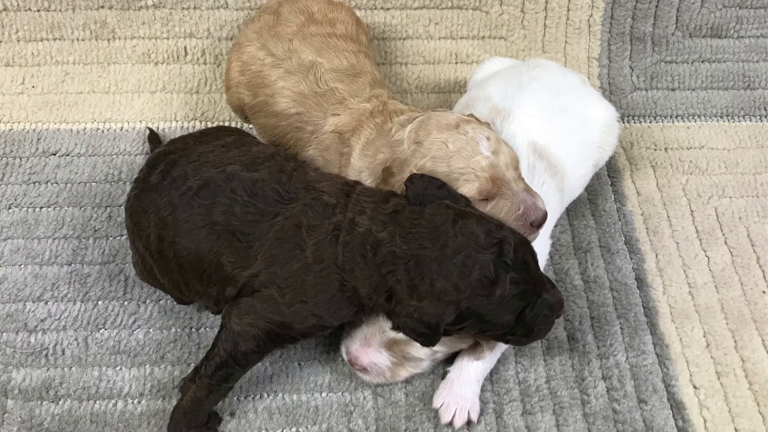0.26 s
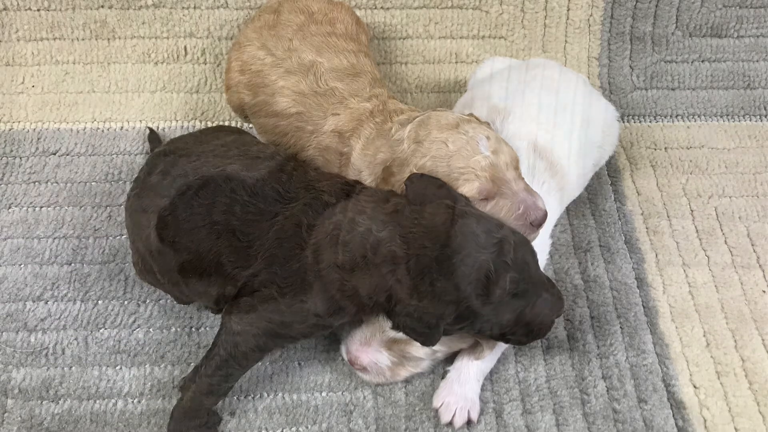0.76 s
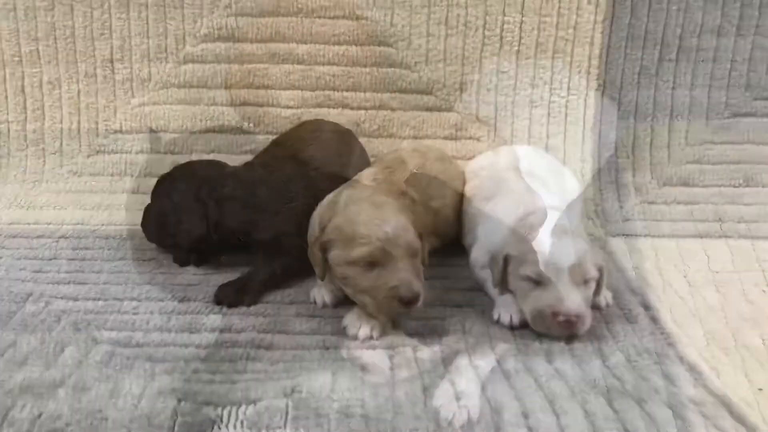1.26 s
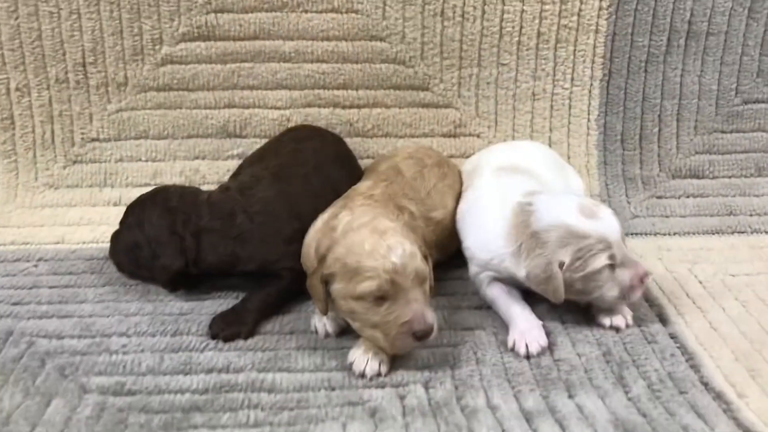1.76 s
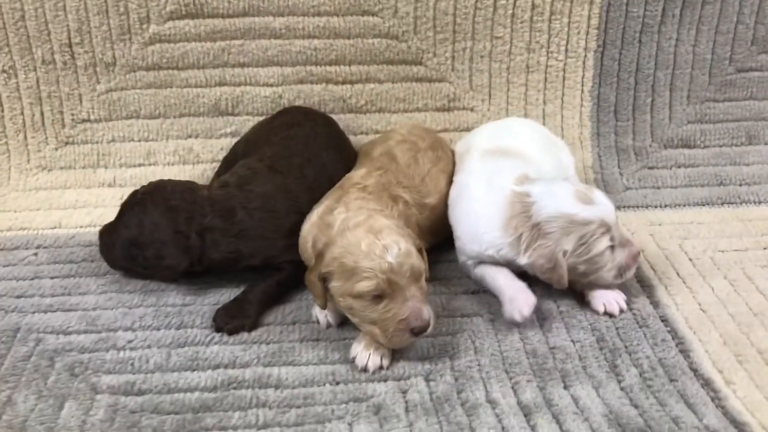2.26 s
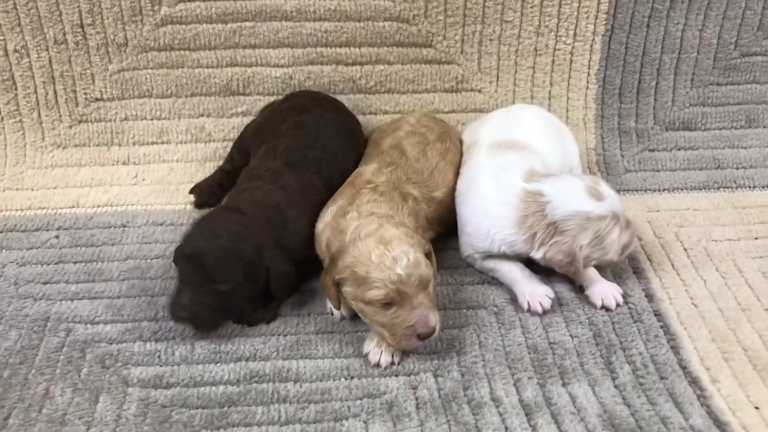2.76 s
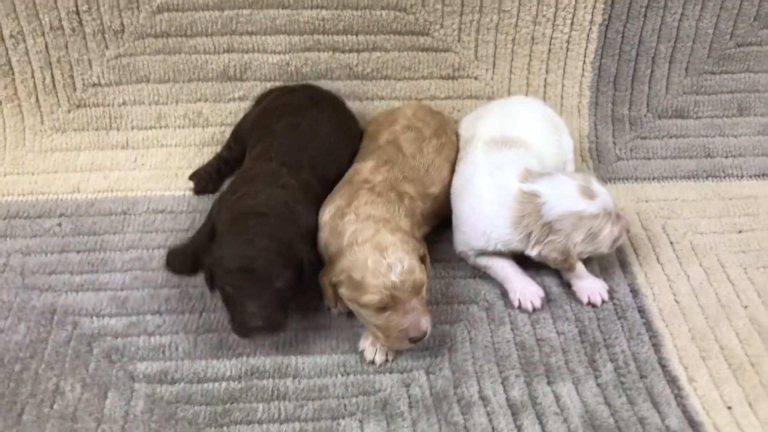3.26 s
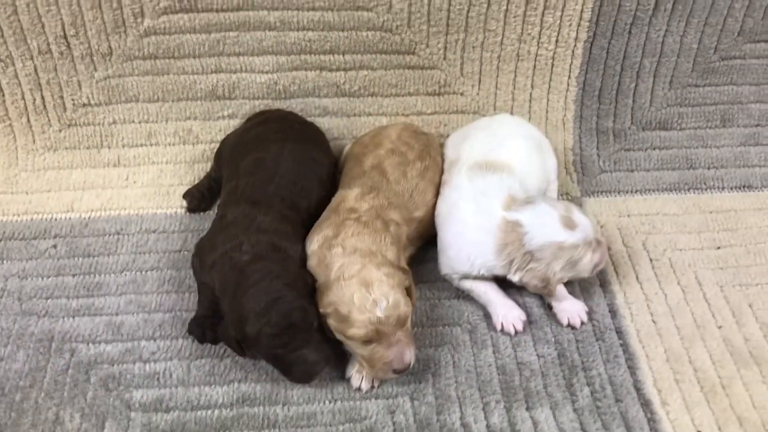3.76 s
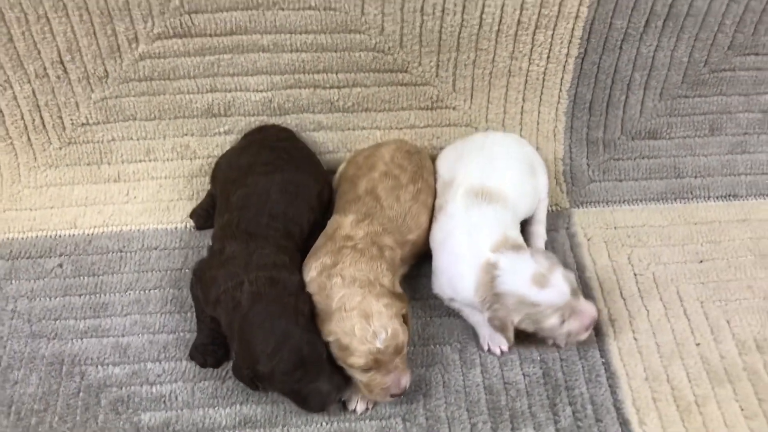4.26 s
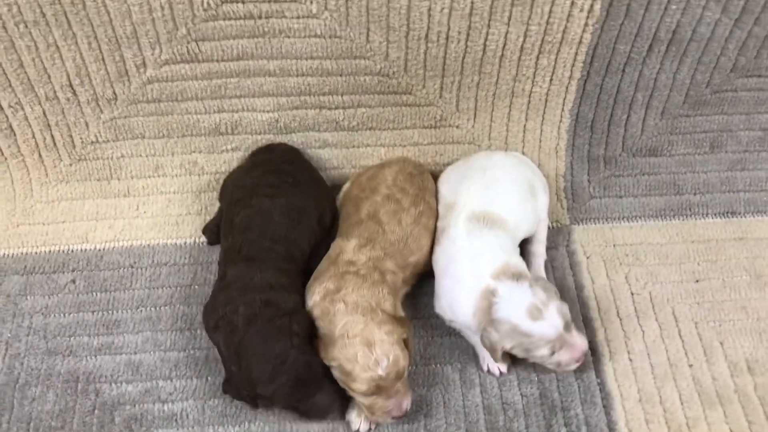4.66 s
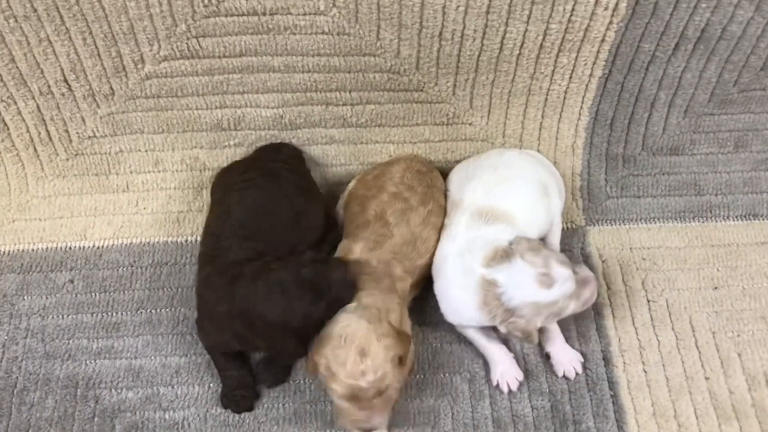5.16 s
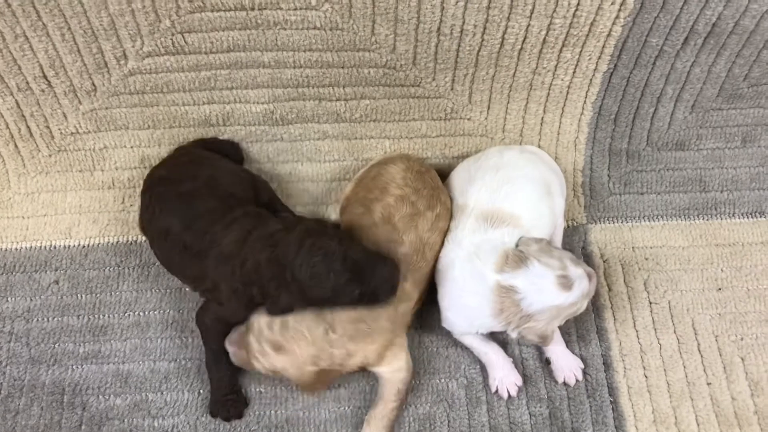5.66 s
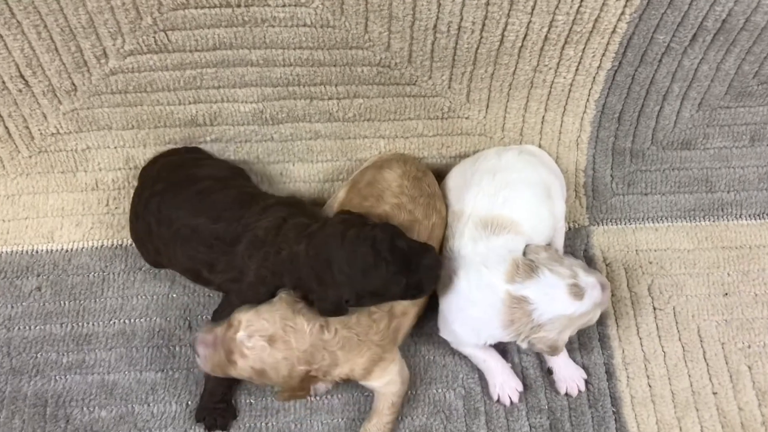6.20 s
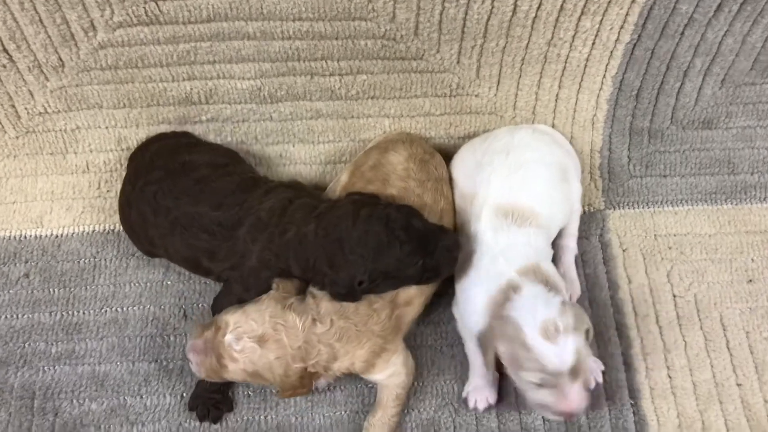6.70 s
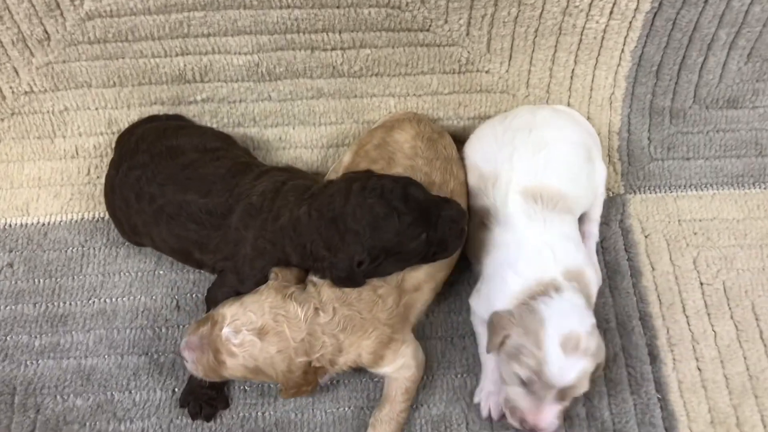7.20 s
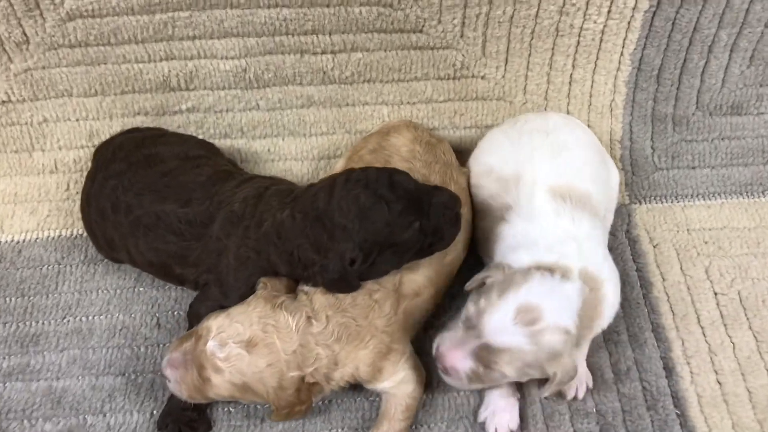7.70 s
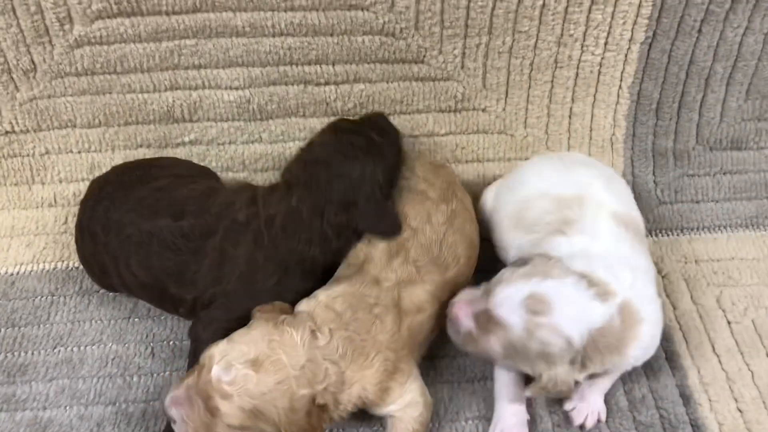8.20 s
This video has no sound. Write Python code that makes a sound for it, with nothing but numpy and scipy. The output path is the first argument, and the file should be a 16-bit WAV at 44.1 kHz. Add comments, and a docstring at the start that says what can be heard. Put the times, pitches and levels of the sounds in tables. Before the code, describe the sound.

Near silence fades into low room rumble and faint hiss. A thin puppy squeak with a hoarse end comes first, then one loud, piercing squeal that shoots up and drops away. Brief newborn squeaks follow, some clear, some raspy and cracked, with soft moans, faint rubbing on a rug, small wet mouth clicks and one dull bump. The microphone is close, in a small, softly echoing room.

```python
"""Newborn puppies squeak on a rug in a quiet room, near a small microphone.
Room rumble, hum and hiss (filtered noise, sines) fade in; a thin squeak with a raspy end and a soft moan follow.
A loud squeal then climbs and falls away; after it come squeaks with moans, rubs, mouth clicks and one bump.
A squeak may start with a rasp, scoop through a dip where it can split into half tones, top out and fall.
Voices are phase-driven harmonics plus noise; spurts of air follow some of the later loud squeaks."""
import sys
import numpy as np
from scipy import signal
from scipy.fft import rfft, irfft, next_fast_len
from scipy.io import wavfile

SR = 44100
rng = np.random.default_rng(int(sys.argv[2]) if len(sys.argv) > 2 else 0)


def dump(signal):
    """Clip the signal to [-1, 1] and save it as 16-bit WAV at the path in sys.argv[1]."""
    limited = np.clip(np.atleast_2d(signal).T, -1, 1)
    pcm = np.round(limited * 32767).astype(np.int16)
    wavfile.write(sys.argv[1], SR, pcm)


N = 372204
TIME_S = np.arange(N) / SR

# deep room noise, relative density: (freq_hz, density_db)
RUMBLE_COLOUR = [(15, -65.5), (25, -33.5), (35, -24.5), (46, -12.5), (70, 2.5), (102, -4), (130, -2),
                 (207, -6.5), (248, -9), (340, -13), (479, -22), (533, -21.5), (687, -24), (752, -28),
                 (900, -31.5), (1170, -56.5), (1980, -120)]
# room hiss, relative density: (freq_hz, density_db)
HISS_COLOUR = [(410, -31), (700, -2), (839, -7.5), (1070, -1), (1290, -6.5), (1760, -3.5), (2590, -7.5),
               (4400, -8), (6330, -10.5), (14700, -14), (15500, -20)]
# faint hum of household machines, before the fade: (freq_hz, level_db)
HUM_LINES = [(65, -75.5), (136, -80.5)]
# background fade: (time_s, gain_db)
BACKGROUND_FADE = [(0, -90), (.56, -51.5), (.62, -19), (.8, -13.5), (.93, -9), (1.2, -3), (1.5, 0.5),
                   (2.3, 0.5), (3.3, 0), (5, 0.5), (8.44, 1.5)]
# room decay: (freq_hz, t60_s)
ROOM_DECAY = [(200, 0.56), (900, 0.325), (2000, 0.3906), (5000, 0.26), (12000, 0.09)]
# bumps of a body on the padded floor, level before the bell: (middle_s, pitch_hz, level_db, bell_sigma_s)
FLOOR_BUMPS = [(2.4629, 131.2, -40, 0.00336)]
# rubbing on the rug; the first row is the first squeak's hoarse end; level before the window:
# (middle_s, length_s, level_db)
RUBS_AND_HOARSE_END = [(1.004, 0.067, -63.5), (3.799, 0.2325, -72.5), (4.151, 0.279, -67.5),
                       (6.483, 0.1664, -68), (6.93, 0.3, -66.5), (7.202, 0.401, -74.5)]
# wet mouth clicks, level before halving and decay: (start_s, level_db)
MOUTH_CLICKS = [(1.333, -50.5), (6.293, -47.5), (8.229, -49)]
# colour of rubs, hoarse end and clicks: (freq_hz, gain_db)
DULL_NOISE_COLOUR = [(150, 2.5), (400, 6.5), (1000, -0.5), (1500, -5.5), (2100, -5.5), (3200, -22.5),
                     (5000, -24.5), (10000, -33), (15000, -41.5)]
# soft low voice tones: moans, a grunt's low end (2.184) and a squeak's soft lead-in (5.546);
# level is the fundamental's, at mid-tone:
# (start_s, length_s, first_hz, middle_hz, last_hz, level_db, overtones_db)
LOW_TONES = [(1.055, 0.0504, 439.4, 474.5, 480, -71.5, -12.5),
             (1.524, 0.082, 400.5, 362.1, 394, -60.5, -16), (2.184, 0.0232, 330, 379, 380, -55, -19.5),
             (4.098, 0.076, 562.2, 458.5, 532, -65, -6), (4.175, 0.0375, 568.6, 624.8, 576, -63, -8.5),
             (4.209, 0.0495, 560, 479.7, 470, -63, -6), (5.546, 0.043, 709, 738.6, 696, -60, -17),
             (6.027, 0.0543, 431, 370.6, 360.5, -59.5, -11), (6.291, 0.0298, 349, 346.5, 318, -51, -15),
             (6.468, 0.0446, 676, 656.2, 614, -61.5, -17), (6.866, 0.071, 486.6, 462.6, 498, -63, -13),
             (7.256, .07, 484, 429.6, 498.2, -61, -8)]
# spurts of air as the folds spring open after a loud squeak, level before the window:
# (middle_s, length_s, level_db)
AIR_SPURTS = [(6.795, 0.086, -67.5), (7.717, 0.04, -71), (8.093, 0.032, -70.5), (8.383, 0.0615, -71)]
# colour of the spurts: (freq_hz, gain_db)
SPURT_COLOUR = [(1000, -25), (2800, 2.5), (4700, -1.5), (7000, -6), (9000, -12), (11000, -7), (14500, -16)]
# throat colour of the upper overtones: (freq_hz, gain_db)
THROAT_COLOUR = [(700, -7), (1100, -1.5), (1400, -5.5), (1650, 0), (2050, 7.5), (2400, -2), (2750, -5.5),
                 (3300, -7), (4000, -13), (4900, -10.5), (5500, -6), (6300, -38), (7500, -32.5)]
# colour of the thin edge from the snap of the folds: (freq_hz, gain_db)
EDGE_COLOUR = [(3000, -33), (5300, -22.5), (6300, -14.5), (7100, 4.5), (7700, -5.5), (8300, 1), (9000, 1),
               (9800, -7.5), (10800, 5.5), (11700, -1), (13200, -5), (14100, -7), (15500, -14.5)]
# colour of rasp and half tones: (freq_hz, gain_db)
RASP_COLOUR = [(150, -10.5), (400, -5.5), (650, -5), (880, 6), (1150, -5), (1500, -10), (2050, -24),
               (2700, -32.5), (5000, -46), (11000, -45.5), (15000, -46)]
# octave strength, strong where it meets a throat resonance: (pitch_hz, db_re_fundamental)
OCTAVE_BY_PITCH = [(530, 7.5), (580, 4.5), (680, -8), (780, -13.5), (870, -13.5), (950, -16.5),
                   (1020, -4.5), (1120, -10), (1300, -16.5), (1450, -18), (1820, -22)]
# upper overtone strength: (pitch_hz, db_re_level)
OVERTONES_BY_PITCH = [(520, -19), (600, -17.5), (680, -14.5), (780, -21), (880, -28.5), (950, -29.5),
                      (1120, -33.5), (1300, -29.5), (1450, -20), (1650, -20.5), (1820, -20.5)]
# squeaks; dip_s and top_s count from start_s, short ones stop before the top;
# levelling flattens the end of the fall (0 = keeps steepening); octave_db and overtones_db offset
# the by-pitch tables; half_tones is a 0-1 strength:
# (start_s, length_s, dip_s, dip_hz, top_s, top_hz, end_hz, levelling, level_db, swell_db, pinch_db,
#  octave_db, overtones_db, edge_db, rasp_s, half_tones)
SQUEAK_CALLS = [ (.832, 0.1947, -0.0014, 1219, 0.0597, 1543, 936.4, 6, -61, 0, -2.5, 0, -15, -30, 0.0028, 0),
                (1.741, 0.1488, -0.0201, 1068, 0.1007, 1822, 969, 0.3, -50, 6.5, 8.5, -3, -2.5, -24.5, 0.00564, 0.53),
                (2.167, 0.0348, 0.0117, 661.4, 0.0413, 727, 725, -1, -60.5, -7, -1.5, -2.5, -8, -26.5, 0.033, 0.081),
                (2.68, 0.1268, 0.0271, 822.2, 0.127, 957.3, 920, 6, -46.5, 3, 0, 3.5, -11, -37.5, 0.0118, 0),
                (3.046, 0.071, .05, 886.2, 0.107, 1049, 1050, -2.5, -51, 4, -1.5, 2, -14, -32, 0.0437, 0.596),
                (3.597, 0.084, .041, 560, 0.1126, 730.2, 725, 0, -50, 1, -0.5, 3.5, 1, -36, 0.016, 0),
                (3.686, 0.0575, 0.02, 813, 0.0538, 899.4, 883, -0.5, -54.5, -5, 4, 3.5, -5, -31, 0.0017, 0),
                (3.89, 0.1589, 0.0403, 628.3, 0.1077, 935.2, 794.4, -0.5, -50, 4, -1, 1.5, -5.5, -31.5, 0.0381, 0.46),
                (4.262, 0.192, 0.0368, 658.8, 0.1011, 906, 571, 4.5, -51.5, 1.5, -4.5, -2, -6, -30, 0.062, 0.415),
                (4.64, 0.1838, 0.0118, 924.4, 0.095, 1399, 730.5, 2, -48, 2, 1.5, -4, -6, -29, 0.014, 0.044),
                (4.82, 0.1306, 0.0139, 760.2, 0.04, 867.9, 685.3, 0, -50, -4, 1, 3.5, 6, -26.5, 0.00057, 0),
                (5.164, 0.1781, 0.0509, 570.1, 0.0954, 702.8, 657.2, 8, -52.5, 9, -1, -4.5, 2.5, -29.5, 0.0432, 0.98),
                (5.583, 0.0957, 0.0575, 517.8, .12, 677.7, 675, -3, -51, 2, -2.5, -3.5, 0.5, -36, 0.032, 0.12),
                (5.951, .083, 0.0403, 831.2, .083, 952.2, 950, 0, -51, 2, 1, -1.5, -8, -34, 0.014, 0),
                (6.243, 0.1638, -0.00087, 1164, 0.1031, 1802, 1047, 0.36, -49, 2.5, 12, 5, 0, -24, 0.00162, 0.012),
                (6.601, 0.191, 0.0302, 946, 0.0975, 1352, 727.7, 3.5, -44.5, 5.5, 3.5, 5.5, 6.5, -29, 0.0102, 0.143),
                (7.005, 0.0485, 0.04216, 602, 0.101, 878, 869, 0, -50.5, -2, -2, -11.5, 8.5, -33, 0.0192, 0.42),
                (7.533, 0.1741, 0.0239, 908.3, .091, 1291, 830.7, 4, -41.5, 1.5, 11, 2.5, -7.5, -32.5, 0.00447, 0.044),
                (7.929, .155, 0.038, 672.1, 0.117, 954, 827.4, 1.75, -45, 0, -5, -1.5, 2, -32.5, 0.01315, 0.062),
                (8.288, 0.076, 0.0442, 534.2, 0.1106, 788.6, 792, 0, -45, 2.5, 6, -4, 2, -31, 0.0126, 0.95)]
# the one loud squeal: (time_s, pitch_hz, level_db, octave_db_re_fundamental, overtones_db_re_level)
SQUEAL_PATH = [(1.274, 1040, -50.5, -3.5, -27), (1.289, 1040, -47.5, 5, -30.5),
               (1.303, 1144, -44, -12, -30.5), (1.328, 1182, -41, 4.5, -17.5),
               (1.35, 1512, -33.5, -9, -10.5), (1.382, 1626, -31.5, -7, -17.5),
               (1.403, 1933, -28, -30.5, -29), (1.43, 2098, -32, -35.5, -54.5),
               (1.469, 1776, -37, -34, -44.5), (1.491, 1518, -45.5, -28.5, -43),
               (1.504, 1123, -70.5, 11, -18.5)]

RUMBLE_DB, HISS_DB = -63.5, -77  # before the fade
LOW_TONE_ENDS_DB, LOW_TONE_RAMP_S = -5.5, 0.0055  # a low tone is loudest in its middle
RAMP_S = .004
SQUEAL_EDGE_DB = -32
RASP_DEPTH, CLEAR_ROUGH = 0.6976, 0.01654  # roughness added at the start; roughness once settled
RASP_DULL_DB, RASP_FLUTTER_DB = -13, 4  # a rasp smothers overtones and sputters; per unit roughness
# half tones last until the pitch climbs out of the dip
SPLIT_AFTER_DIP_S, SPLIT_FADE_S, CLEAR_HALF = 0.0213, 0.002, 0.0132
# low notes are hoarse; half tones come and go
SLACK_HZ, SLACK_ROUGH, SPLIT_WAVER = 591, 0.0727, 0.333
OPEN_S, OPEN_DB = 0.0134, -4  # soft start
# taut folds shut with a push, slack ones with a soft rattle
CLOSE_S, CLOSE_DB, CLOSE_PER_OCTAVE_DB, CLOSE_ROUGH = 0.00575, -3.5, 10, 0.26
# barely touching at either end, the folds make few overtones
DULL_S, DULL_OCTAVE_DB, DULL_UPPER_DB = .012, -8.5, -5.5
PINCH_S, PINCH_LEAD_S = 0.03086, 0.0064  # width of the throat's tightening; its lead on the top
PINCH_OCTAVE = 0.514  # share of the pinch that the octave escapes
CLIMB_BRIGHT = 0.89  # pinched throat is brighter on the climb than on the fall: share of the pinch
FALL_HALF, FALL_ROUGH = 0.065, .04  # falling from the top, folds slacken and grow uneven
CUTOFF_HZ = 15500


def amp(db):
    """Decibels to gain."""
    return 10 ** (np.asarray(db) / 20)


def unit(x):
    """Scales to rms 1."""
    return x / np.sqrt(np.mean(x ** 2) + 1e-20)


def read(points, hz):
    """Reads a table on a log-frequency axis."""
    point_hz, value = np.transpose(points)
    return np.interp(np.log(hz + 1), np.log(point_hz + 1), value)


def colour(x, points):
    """Filters by a spectrum table; rms 1."""
    size = next_fast_len(len(x))
    gain = amp(read(points, np.fft.rfftfreq(size, 1 / SR)))
    return unit(irfft(rfft(x, size) * gain, size)[:len(x)])


def wander(count, rate_hz):
    """Smooth random motion of about rms 1, no faster than about rate_hz."""
    size = next_fast_len(count + SR // 4)
    hz = np.fft.rfftfreq(size, 1 / SR)
    spectrum = rfft(rng.standard_normal(size)) * np.exp(-(hz / rate_hz) ** 2)
    return unit(irfft(spectrum, size))[:count]


def add(mix, start_s, sound):
    """Mixes a sound in at a time."""
    part = mix[max(round(start_s * SR), 0):][:len(sound)]
    part += sound[:len(part)]


def gate(t, ramp_s):
    """Smooth on and off at the ends of a call."""
    from_end_s = np.minimum(t - t[0], t[-1] - t)
    return np.sin(np.pi / 2 * np.clip(from_end_s / ramp_s, 0, 1)) ** 2


def curve(t, s, values):
    """A rounded (cubic) line through control points."""
    i = np.clip(np.searchsorted(s, t) - 1, 0, len(s) - 2)
    step, rise = np.diff(s)[i], np.diff(values)[i]
    slope = np.gradient(values, s)
    u = np.clip((t - s[i]) / step, 0, 1)
    bend_in = slope[i] * step - rise
    bend_out = slope[i + 1] * step - rise
    return values[i] + u * rise + u * (1 - u) * ((1 - u) * bend_in - u * bend_out)


def partials(turns, hz, multiples, shape, slope_db, uneven_db=0):
    """Pitch multiples sweep through a fixed colour, each swelling on its own; about rms 1 together."""
    k = multiples[:, None]
    swell = np.array([wander(len(hz), rate_hz=40) for _ in multiples])
    gain = amp(read(shape, k * hz) + slope_db * np.log2(k) + uneven_db * swell)
    gain = gain * (k * hz < SR / 2)
    return (gain * np.cos(2 * np.pi * k * turns)).sum(0) / np.sqrt((gain ** 2).sum(0) / 2)


def background(swell_db=0.74, heave_db=2.67, split_hz=170):
    """Deep rumble, nearly steady below the split and heaving above it; faint hum; even hiss."""
    rumble = colour(rng.standard_normal(N), RUMBLE_COLOUR)
    deep = signal.sosfiltfilt(signal.butter(2, split_hz, fs=SR, output="sos"), rumble)
    steady = deep * amp(swell_db * wander(N, rate_hz=11))
    heaving = (rumble - deep) * amp(heave_db * wander(N, rate_hz=22))
    hum = sum(np.sqrt(2) * amp(db) * np.sin(2 * np.pi * (hz * TIME_S + rng.random()))
              for hz, db in HUM_LINES)
    hiss = amp(HISS_DB) * colour(rng.standard_normal(N), HISS_COLOUR)
    fade = amp(np.interp(TIME_S, *np.transpose(BACKGROUND_FADE)))
    return (amp(RUMBLE_DB) * (steady + heaving) + hum + hiss) * fade


def room(x, wet_db=-19, early_db=-20, early_decay_s=0.018, delay_s=0.0034):
    """Near walls answer with sparse early echoes, over a soft tail whose treble dies soonest."""
    t = np.arange(SR // 2) / SR
    hz, frame_s, z = signal.stft(rng.standard_normal(len(t)), SR, nperseg=256)
    decay = amp(-60 * frame_s / read(ROOM_DECAY, hz)[:, None])
    tail = signal.istft(z * decay, SR, nperseg=256)[1][:len(t)]
    sparse = rng.random(len(t)) < 600 / SR  # about 600 echoes per second
    early = rng.standard_normal(len(t)) * sparse * np.exp(-t / early_decay_s)
    late = t > delay_s
    echo = amp(wet_db) * unit(tail * late) + amp(early_db) * unit(early * late)
    return x + signal.fftconvolve(x, echo / np.sqrt(len(t)))[:N]


def bumps():
    """Dull thuds: a low sine under a bell-shaped envelope."""
    out = np.zeros(N)
    for middle_s, hz, db, sigma_s in FLOOR_BUMPS:
        t = TIME_S - middle_s
        out += amp(db) * np.exp(-(t / sigma_s) ** 2 / 2) * np.sin(2 * np.pi * hz * t)
    return out


def rubs_and_hoarse_end(clump_db=2.0):
    """Rubbing on the rug, and the first squeak's hoarse end: coloured noise with clumpy level."""
    out = np.zeros(N)
    for middle_s, length_s, db in RUBS_AND_HOARSE_END:
        count = int(length_s * SR)
        clumpy = rng.standard_normal(count) * amp(clump_db * wander(count, rate_hz=140))
        noise = np.hanning(count) ** .5 * colour(clumpy, DULL_NOISE_COLOUR)
        add(out, middle_s - length_s / 2, amp(db) * noise)
    return out


def mouth_clicks(decay_s=0.005):
    """Wet clicks: coloured noise dying exponentially."""
    out, t = np.zeros(N), np.arange(SR // 10) / SR
    for start_s, db in MOUTH_CLICKS:
        noise = colour(rng.standard_normal(len(t)), DULL_NOISE_COLOUR)
        add(out, start_s, amp(db) / 2 * np.exp(-t / decay_s) * noise)
    return out


def low_tones():
    """Soft low voice, weak overtones; pitch and level (dB) each follow a parabola."""
    out = np.zeros(N)
    for start_s, length_s, first_hz, middle_hz, last_hz, level_db, over_db in LOW_TONES:
        t = np.arange(0, length_s, 1 / SR)
        u = 2 * t / length_s - 1
        hz = np.polyval(np.polyfit([-1, 0, 1], [first_hz, middle_hz, last_hz], 2), u)
        turns = np.cumsum(hz * (1 + .012 * wander(len(hz), rate_hz=150))) / SR
        fundamental = np.sqrt(2) * np.cos(2 * np.pi * turns)
        overtones = amp(over_db) * partials(turns, hz, np.arange(2, 6), THROAT_COLOUR, slope_db=-17)
        envelope = amp(level_db + LOW_TONE_ENDS_DB * u ** 2) * gate(t, LOW_TONE_RAMP_S)
        add(out, start_s, envelope * (fundamental + overtones))
    return out


def spurts():
    """Air let out as the folds spring open: windowed coloured noise."""
    out = np.zeros(N)
    for middle_s, length_s, db in AIR_SPURTS:
        count = int(length_s * SR)
        air = colour(rng.standard_normal(count), SPURT_COLOUR)
        add(out, middle_s - length_s / 2, amp(db) * np.hanning(count) * air)
    return out


def folds(hz, octave_db, upper_db, edge_db, half, rough, jitter=0.0045, rough_jitter=.08, half_db=-3,
          rasp_db=-2, air_db=-34, shimmer_db=1.0, flutter_db=1.5, snap_jitter_turns=.009, airy_hz=720,
          octave_waver_db=2):
    """Vocal folds whistle cleanly, alternate strong and weak cycles, or rattle irregularly."""
    count, half, rough = len(hz), np.clip(half, 0, 1), np.clip(rough, 0, 1)
    # slack folds lose their steady period
    turns = np.cumsum(hz * (1 + (jitter + rough_jitter * rough) * wander(count, rate_hz=200))) / SR
    octave_db = octave_db + octave_waver_db * wander(count, rate_hz=86)
    tone = np.cos(2 * np.pi * turns) + amp(octave_db) * np.sin(2 * np.pi * 2 * turns)
    tone *= np.sqrt(2 / (1 + amp(2 * octave_db)))
    tone *= amp(shimmer_db * wander(count, rate_hz=110.0))
    overtones = np.arange(3, 27)
    upper = amp(upper_db) * partials(turns, hz, overtones, THROAT_COLOUR, slope_db=-14.0, uneven_db=2.0)
    # the instant of closing varies from cycle to cycle and smears the highest lines
    snap_turns = turns + snap_jitter_turns * wander(count, rate_hz=780)
    snap = partials(snap_turns, hz, overtones, EDGE_COLOUR, slope_db=-8.5, uneven_db=5.5)
    # the lower the pitch, the more air leaks through and turns the edge into hiss
    leak = (airy_hz / hz) ** 2
    hiss = colour(rng.standard_normal(count) * (1 + np.cos(2 * np.pi * turns)), EDGE_COLOUR)
    edge = (snap + leak * hiss) / np.sqrt(1 + leak ** 2)
    edge *= amp(edge_db + flutter_db * wander(count, rate_hz=120))
    # every second cycle weaker: lines halfway between the harmonics
    halves = amp(half_db) * partials(turns, hz, np.arange(6) + .5, RASP_COLOUR, slope_db=0)
    # rattling folds let out a puff of air on every strong cycle
    puffs = colour(rng.standard_normal(count) * (1 + np.cos(np.pi * turns)), RASP_COLOUR)
    puff_gain = rough * amp(rasp_db) + leak * amp(air_db)
    clean = np.sqrt((1 - rough ** 2) * (1 - half ** 2 / 2))
    return clean * tone + upper + edge + half * halves + puff_gain * puffs


def squeal(rough=.01):
    """Start and sound of the loud cry: clean folds, bright on the climb, nearly pure at the top."""
    s, pitch_hz, *levels = np.transpose(SQUEAL_PATH)
    t = np.arange(s[0] - RAMP_S / 2, s[-1], 1 / SR)
    level_db, octave_db, upper_db = (np.interp(t, s, column) for column in levels)
    voice = folds(curve(t, s, pitch_hz), octave_db, upper_db, SQUEAL_EDGE_DB, 0, rough)
    return t[0], amp(level_db) * gate(t, RAMP_S) * voice


def glide(t, dip_s, dip_hz, top_s, top_hz, end_hz, levelling):
    """Pitch swings through the dip up to the top, then falls to the end."""
    swing = np.sin(np.pi / 2 * (t - dip_s) / (top_s - dip_s)) ** 2
    climb_hz = dip_hz + (top_hz - dip_hz) * swing
    u = np.maximum(t - top_s, 0) / max(t[-1] - top_s, 1e-6)
    bend = levelling + 1e-6
    fall_hz = top_hz + (end_hz - top_hz) * np.expm1(-bend * u ** 2) / np.expm1(-bend)
    return np.where(t < top_s, climb_hz, fall_hz)


def squeak(length_s, dip_s, dip_hz, top_s, top_hz, end_hz, levelling, level_db, swell_db, pinch_db,
           octave_db, over_db, edge_db, rasp_s, half):
    """Colour follows pitch; a throat tight near the top chokes the fundamental, spares the overtones."""
    t = np.arange(-RAMP_S / 2, length_s + RAMP_S / 2, 1 / SR)
    hz = glide(t, dip_s, dip_hz, top_s, top_hz, end_hz, levelling)
    past_top = (t - top_s + PINCH_LEAD_S) / PINCH_S
    pinch = pinch_db * np.exp(-past_top ** 2)
    fallen = (t > top_s) * np.tanh(4 * np.log2(top_hz / hz)) ** 2
    opening = np.exp(-(t / OPEN_S) ** 2)
    closing = np.exp(-((t - length_s) / CLOSE_S) ** 2)
    ends = np.exp(-(t / DULL_S) ** 2) + np.exp(-((t - length_s) / DULL_S) ** 2)

    rough = CLEAR_ROUGH + RASP_DEPTH * np.exp(-(t / max(rasp_s, 1e-6)) ** 4)
    rough += CLOSE_ROUGH * closing * (SLACK_HZ / hz) ** 2
    rough += FALL_ROUGH * fallen + SLACK_ROUGH * (SLACK_HZ / hz) ** 4
    in_dip = (1 - np.tanh((t - dip_s - SPLIT_AFTER_DIP_S) / SPLIT_FADE_S)) / 2
    split = CLEAR_HALF + half * in_dip + FALL_HALF * fallen
    split *= 1 + SPLIT_WAVER * wander(len(t), rate_hz=46)

    octave = read(OCTAVE_BY_PITCH, hz) + octave_db + PINCH_OCTAVE * pinch
    octave += DULL_OCTAVE_DB * ends + RASP_DULL_DB * rough
    upper = read(OVERTONES_BY_PITCH, hz) + over_db + pinch * (1 - CLIMB_BRIGHT * past_top)
    upper += DULL_UPPER_DB * ends + RASP_DULL_DB * rough
    level = level_db + swell_db * (t / length_s - .5) - pinch
    level += RASP_FLUTTER_DB * rough * wander(len(t), rate_hz=115)
    level += OPEN_DB * opening
    level += (CLOSE_DB + CLOSE_PER_OCTAVE_DB * np.log2(hz / SLACK_HZ)) * closing
    return amp(level) * gate(t, RAMP_S) * folds(hz, octave, upper, edge_db + pinch, split, rough)


def cries():
    """The loud squeal and all the squeaks."""
    out = np.zeros(N)
    add(out, *squeal())
    for start_s, *shape in SQUEAK_CALLS:
        add(out, start_s - RAMP_S / 2, squeak(*shape))
    return out


def scene():
    """The litter in its room, over the background."""
    litter = bumps() + rubs_and_hoarse_end() + mouth_clicks() + low_tones() + spurts() + cries()
    return (background() + room(litter))[None]


def record(dry):
    """The recorder's band limit: a linear-phase low-pass."""
    lowpass = signal.firwin(511, CUTOFF_HZ, window=("kaiser", 9), fs=SR)
    return signal.oaconvolve(dry, lowpass[None], "same")


dry = scene()
out = record(dry)
dump(out)
```